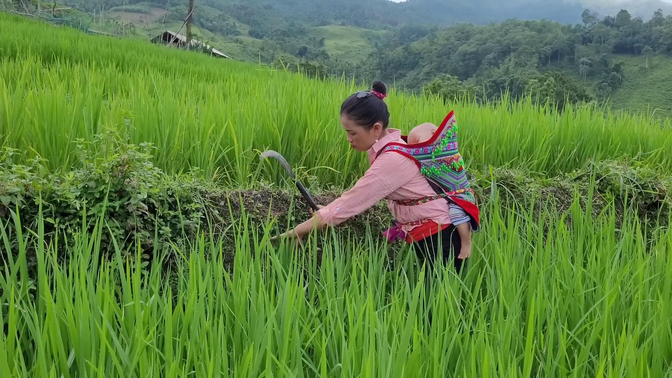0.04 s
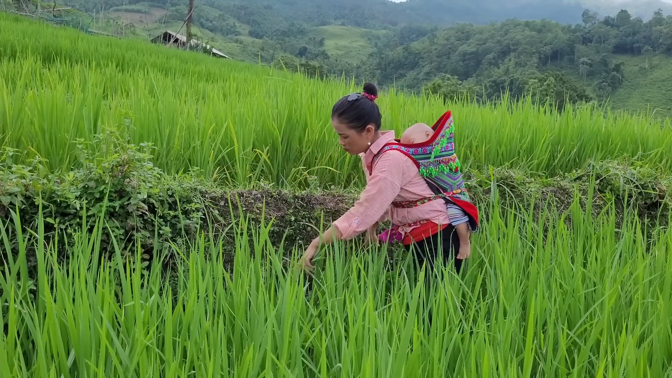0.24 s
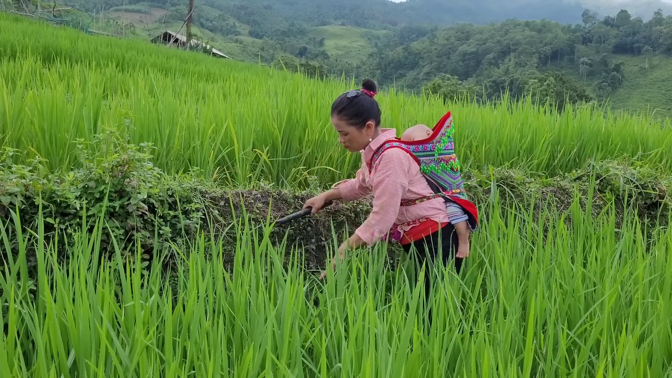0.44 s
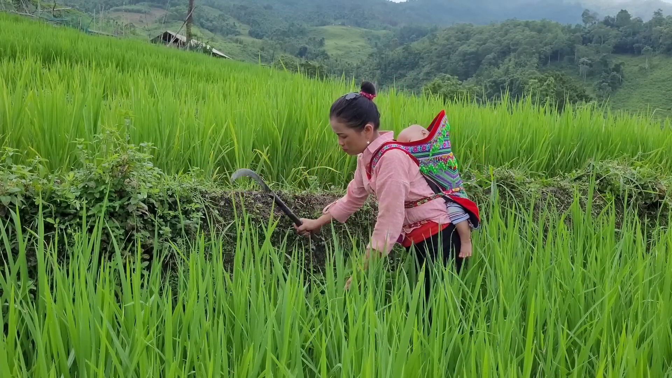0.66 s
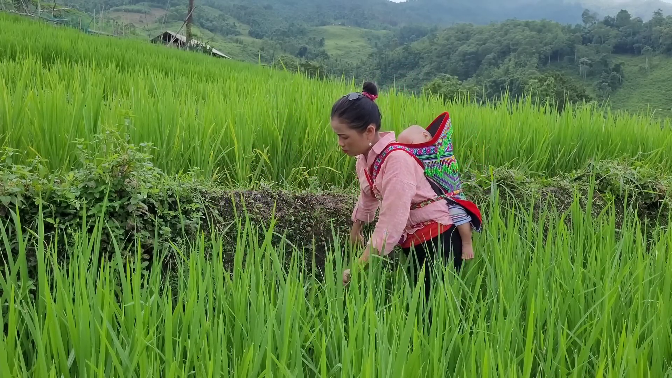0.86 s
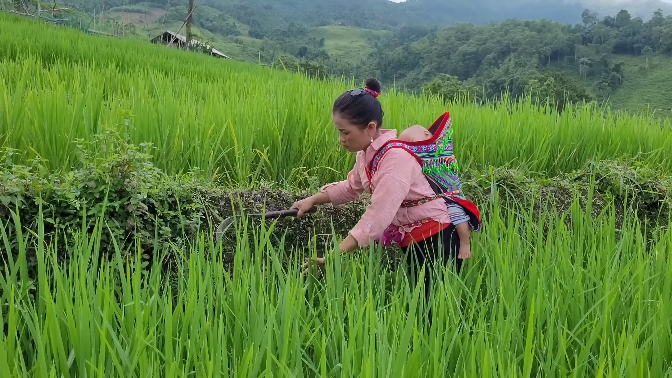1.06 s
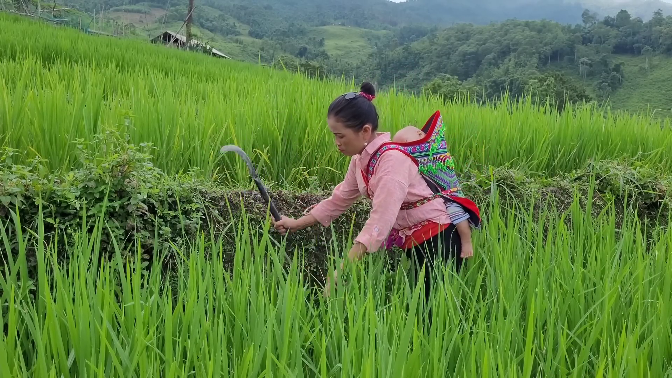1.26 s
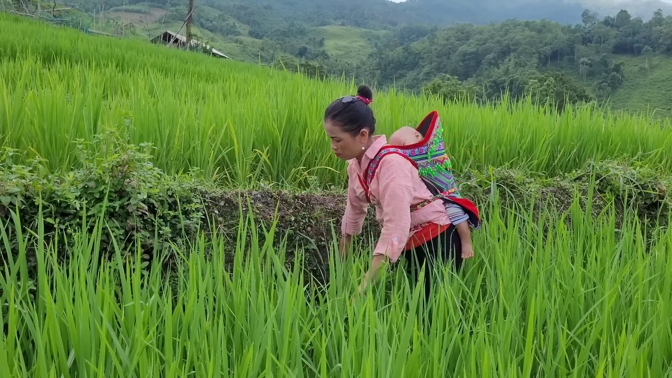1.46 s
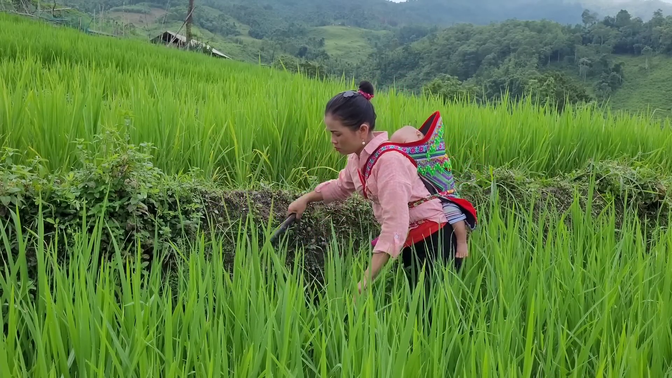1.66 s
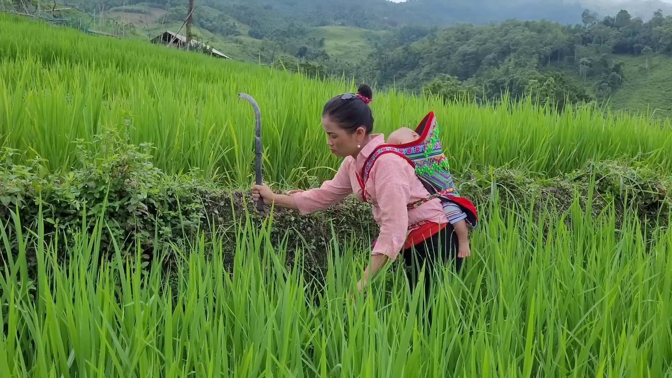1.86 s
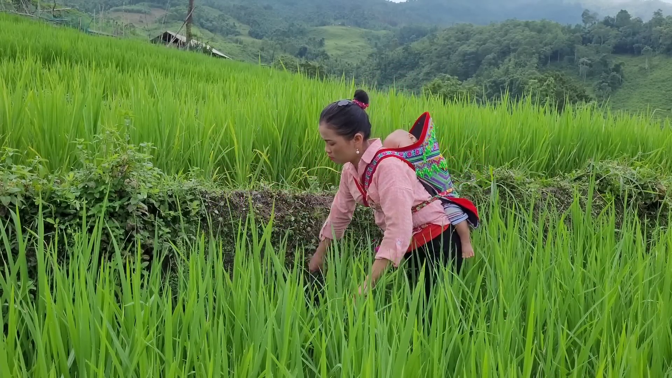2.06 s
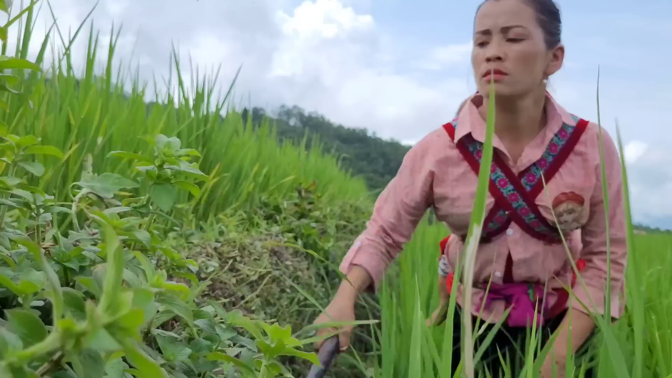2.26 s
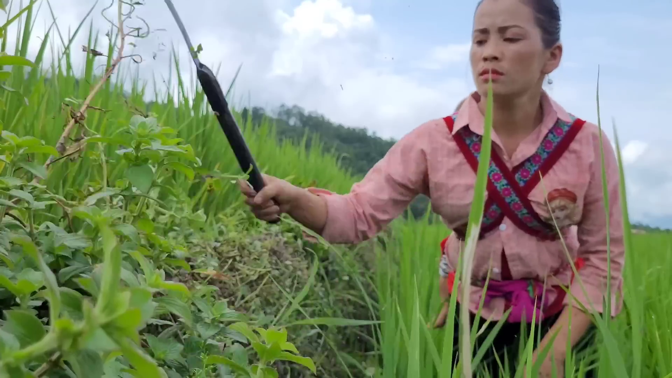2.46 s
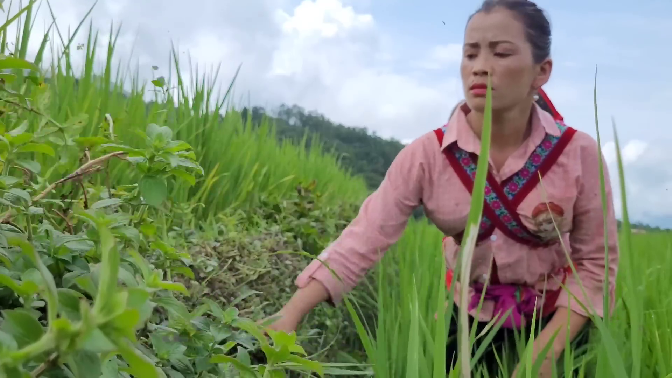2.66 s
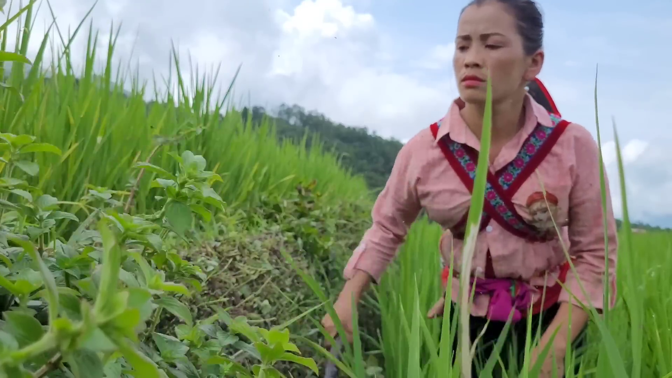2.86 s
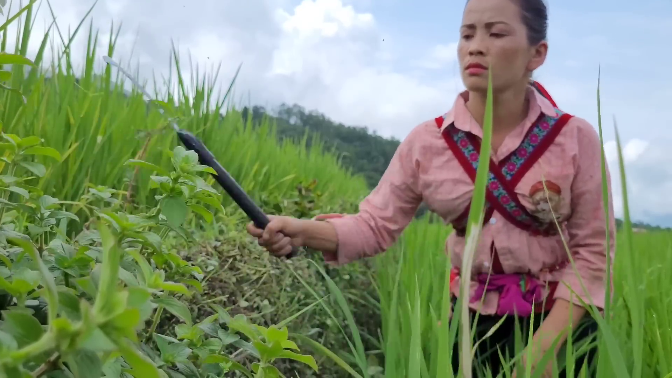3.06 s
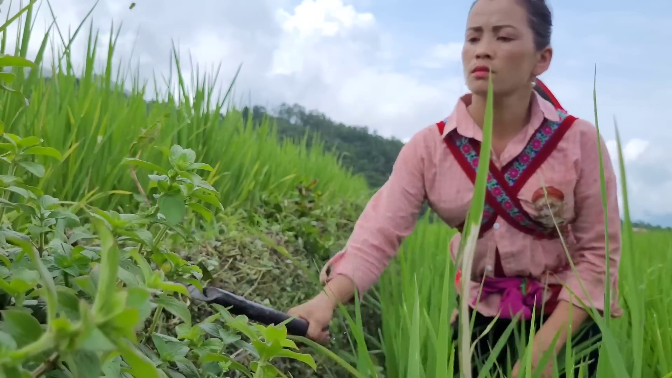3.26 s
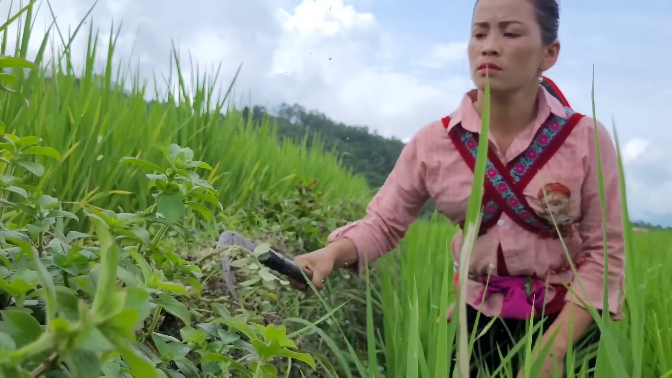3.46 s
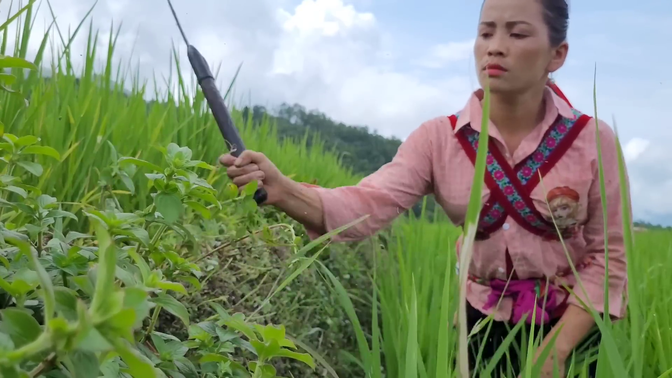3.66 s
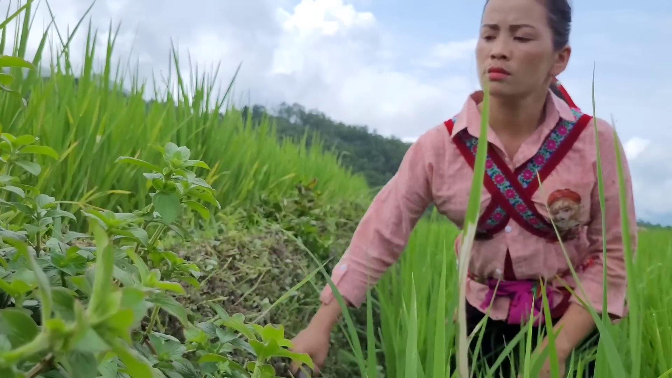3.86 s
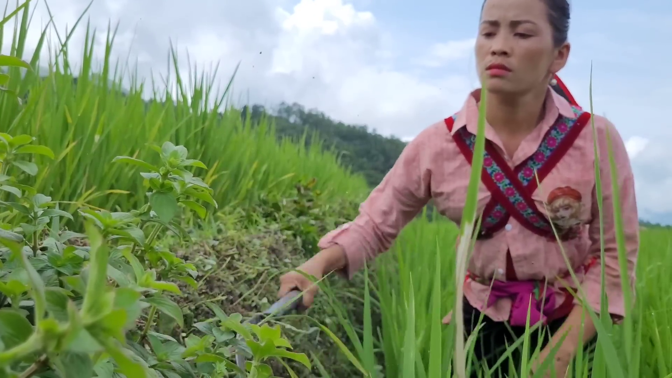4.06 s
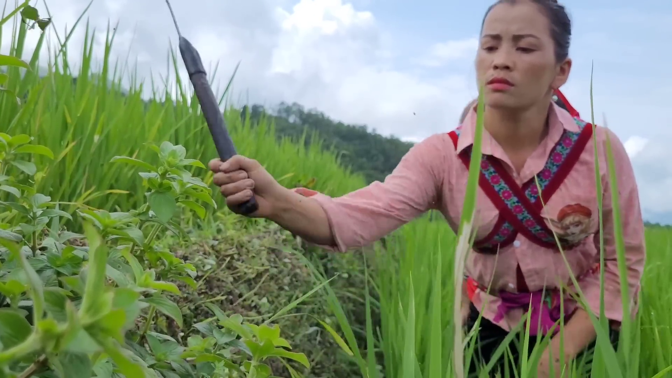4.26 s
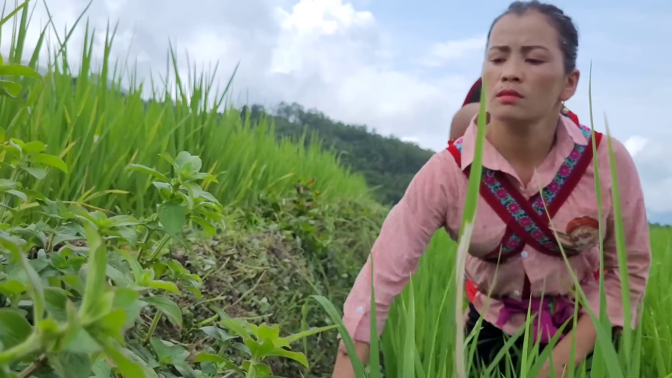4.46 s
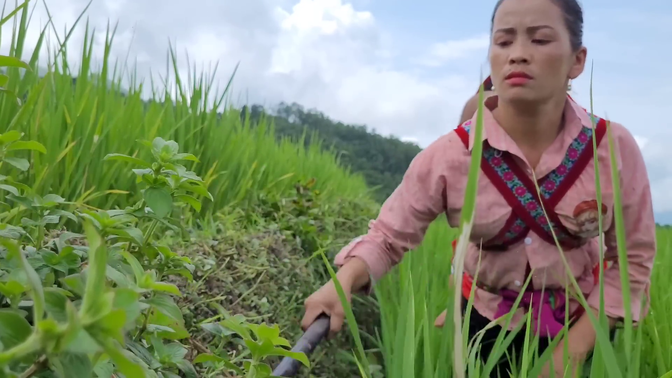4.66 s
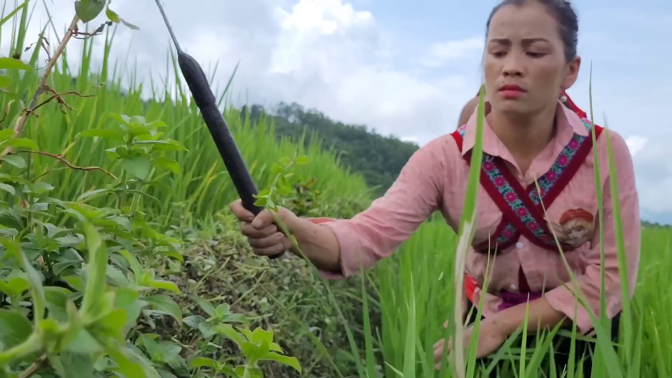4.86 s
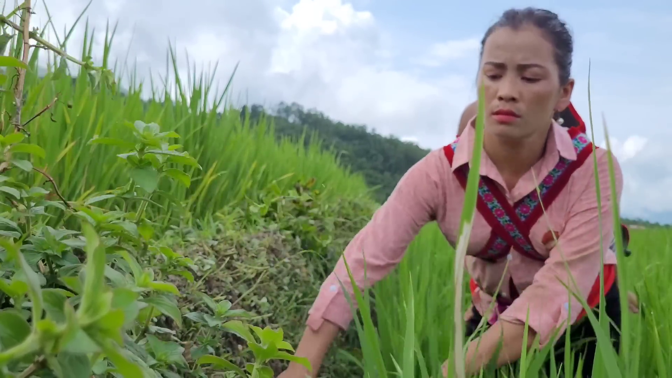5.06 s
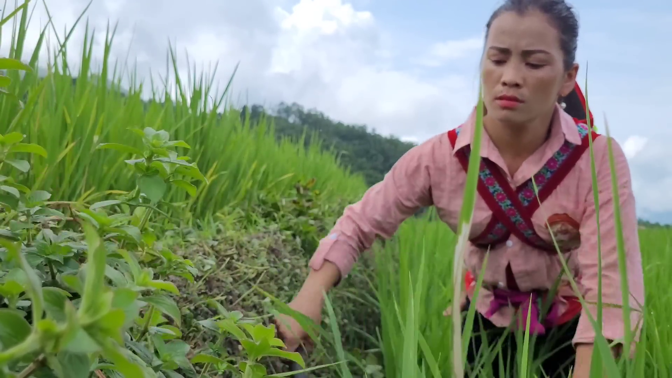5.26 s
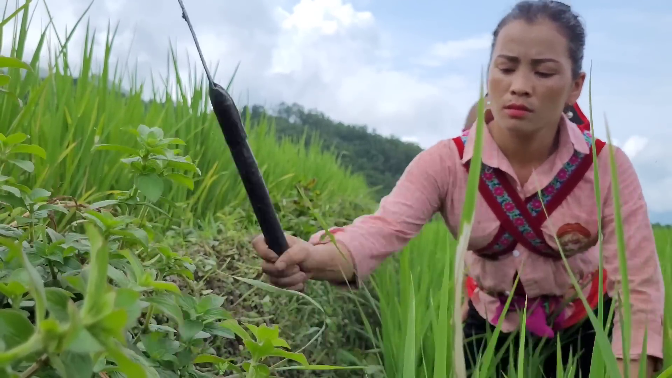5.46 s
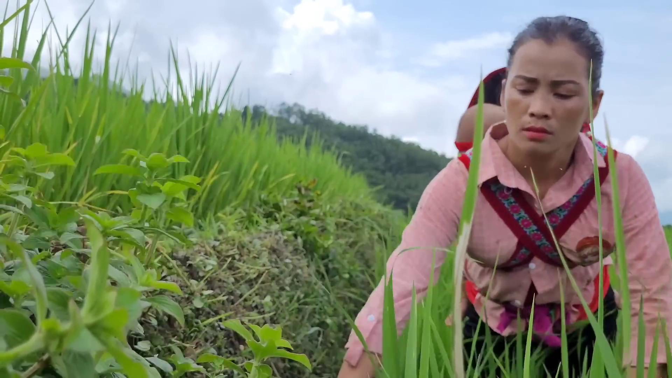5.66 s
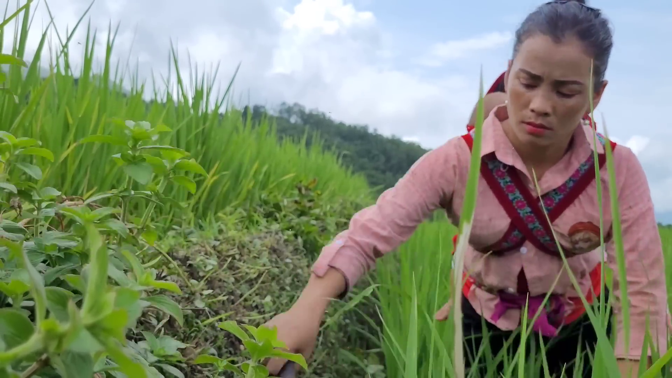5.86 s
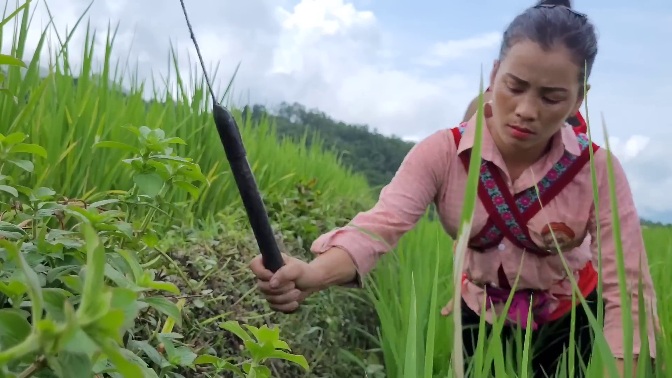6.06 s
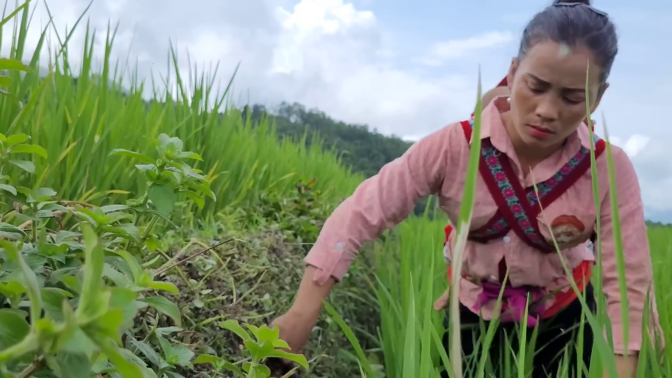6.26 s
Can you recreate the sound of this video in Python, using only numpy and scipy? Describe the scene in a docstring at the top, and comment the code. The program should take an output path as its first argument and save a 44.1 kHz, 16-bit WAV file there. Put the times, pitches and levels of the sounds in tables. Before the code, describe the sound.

A sickle chops weeds in quiet open country, eleven crunchy strokes at a steady pace, distant at first, then suddenly close and louder, leaves rustling between.

```python
"""A sickle slashes weeds off the bank of a rice terrace in quiet open country: eleven strokes.
The first four are heard from a few metres, with a clack of steel in the fourth; the other seven from close by.
Each stroke is a dense burst of tiny random fractures and ringing splinters; from the sixth on, most thump the soil.
Leaves rustle as a sparser crackle; single stems snap, and at 4.48 s the blade rings high, as damped tones.
From about 2.5 s a faint bird peeps in short gliding tones; coloured noise forms the air throughout."""
import sys
import numpy as np
from scipy import signal
from scipy.fft import rfft, irfft
from scipy.io import wavfile
from scipy.ndimage import uniform_filter1d

SR = 44100
rng = np.random.default_rng(int(sys.argv[2]) if len(sys.argv) > 2 else 0)


def wav_out(sig):
    """Save sig, one row per channel (or a flat mono array), as 16-bit PCM at SR to the path in sys.argv[1]."""
    wavfile.write(sys.argv[1], SR, np.round(np.clip(np.atleast_2d(sig).T, -1, 1) * 32767).astype(np.int16))


N = 278271
T = np.arange(N) / SR
CLOSE_FROM_S = 2.405  # heard from a few metres before, from close by after

# The sickle cuts, and the plants shake on:
# start_s, rise_s, hold_s, fade_s, level_db, treble_db and bass_db (leaves and wood, relative to level_db),
# shake_db, shake_fade_s
STROKES = [ (0.168, .015, 0.0064, 0.035, -24.5, 2, 3, -40, 0.17),
           (0.78, 0.021, 0.048, 0.016, -26.5, 1.5, 1.5, -44, 0.3),
           (1.397, .021, 0.035, 0.027, -21, 2.5, -3, -53, 0.17),
           (2.028, 0.0029, 0.031, 0.0097, -22, 6.5, 5.5, -32, 0.077),
           (2.754, .012, 0.0088, 0.035, -12.5, 0.5, 1.5, -37, 0.067),
           (3.316, 0.0085, 0.0064, 0.01, -19.5, 2, 0.5, -39.5, 0.21),
           (3.879, 0.0056, 0.011, 0.024, -17, -0.5, 3, -33, 0.18),
           (4.477, 0.0019, 0.037, 0.021, -14.5, 1.5, 1, -28, 0.11),
           (5.098, 0.013, 0.0038, 0.064, -14, -0.5, 1.5, -30, 0.28),
           (5.699, 0.013, 0.038, 0.031, -18, 2, 0.5, -31, 0.12),
           (6.254, .022, 0.012, 0.028, -16, 1.5, 1.5, -32, .15)]


def undb(db):
    """Amplitude ratio: decibels to gain."""
    return 10 ** (np.asarray(db) / 20)


def unit(x):
    """Power normalisation: scale to rms 1."""
    return x / np.sqrt(np.mean(x ** 2))


def response(points, size=2048):
    """Minimum phase: the causal impulse response of a (Hz, dB) colour, by folding its cepstrum."""
    hz, db = np.transpose(points)
    f = np.maximum(np.fft.rfftfreq(size, 1 / SR), 1)
    log_gain = np.log(undb(np.interp(np.log(f), np.log(hz), db)))
    cepstrum = irfft(log_gain)
    cepstrum[1:size // 2] *= 2
    cepstrum[size // 2 + 1:] = 0
    return irfft(np.exp(rfft(cepstrum)))


def colour(x, points):
    """Linear filtering: white sound takes on a colour and keeps its power."""
    h = response(points)
    return signal.fftconvolve(x, h[None] / np.linalg.norm(h), axes=1)[:, :N]


def near_or_far(x, far, near):
    """Distance colours sound: one spectrum from a few metres, another right beside the plants."""
    return np.where(T < CLOSE_FROM_S, colour(x, far), colour(x, near))


def split(x, hz):
    """Complementary bands: the parts below and above a frequency add up to the whole."""
    lowpass = signal.butter(2, min(hz, SR / 3), fs=SR, output="sos")
    low = signal.sosfiltfilt(lowpass, x)
    return low, x - low


def walk(rate):
    """Slow modulation: random levels at a rate (per second) joined by straight slopes, scaled to rms 1."""
    k = max(int(SR / rate), 2)
    steps = rng.standard_normal(N)[np.arange(N) // k]
    return unit(uniform_filter1d(steps, k))


def swell(s, rise, hold, fade):
    """Envelope of one movement: a straight rise, a hold and an exponential fade."""
    attack = np.clip((T - s) / rise, 0, 1)
    return attack * np.exp(-np.clip((T - s - rise - hold) / fade, 0, 20))


def ring(hz, t60, phase=0, size=12000):
    """Damped resonance: one mode falling by 60 dB in t60; 0 Hz at phase pi / 2 is the bare decay."""
    t = np.arange(size) / SR
    return np.sin(2 * np.pi * hz * t + phase) * np.exp(-np.log(1000) * t / t60)


def add(out, s, sound):
    """Superposition: mix a sound in at a time."""
    i = int(s * SR)
    out[:, i:i + sound.shape[-1]] += sound[..., :N - i]


def fractures(per_s, scatter_db, lag_ms, spread_ms):
    """Random impulses: tiny clicks of unequal size, each with its own lag between the ports for its direction."""
    excess = np.minimum(rng.standard_exponential(N), 4)
    size = rng.choice([-1, 1], N) * undb(scatter_db * excess)
    left = size * (rng.random(N) < per_s / SR)
    lag = (lag_ms + spread_ms * rng.standard_normal(N)) * SR / 1000
    arrival = np.rint(np.arange(N) + lag).astype(int) % N
    right = np.bincount(arrival, left, N)
    return unit(np.array([left, right]))


def splinters(t60_at_1k, scatter_db, count=3500):
    """Modal ringing: each broken stem has its own pitch; thick ones are low and ring longer."""
    out = np.zeros((2, N))
    for when, thinness, force, place in rng.random((count, 4)):
        khz = .2 * 18 ** thinness
        t60 = t60_at_1k / np.sqrt(khz)
        size = np.sqrt(khz) * undb(scatter_db * min(-np.log(1 - force), 3))
        lag_turns = khz * (.3 * place - .08)  # kHz times a lag in ms
        phases = -2 * np.pi * np.array([[0], [lag_turns]])
        add(out, when * N / SR, size * ring(1000 * khz, t60, phases, size=int(t60 * SR) + 2))
    return unit(out)


def country():
    """Diffuse field: far air swells gently, its bass more alike on both sides than its treble."""
    # colours of the open air: frequency_hz, gain_db
    far = [(25, -16), (65, 4), (110, -0.5), (270, 1.5), (600, 1), (1100, -1), (1700, 1.5), (2300, -20),
           (2850, -3.5), (3600, -25), (6500, -17), (16000, -25)]
    near = [(25, -15), (65, 7), (110, 2.5), (280, 5.5), (550, 7), (1000, -3), (1600, -0.5), (2500, -6.5),
            (3100, -28), (4800, -13), (7000, -14), (16000, -9.5)]
    mid, side = rng.standard_normal((2, N))
    side_low, side_high = split(side, hz=655)
    side = 0.51 * side_low + 1.7 * side_high
    air = unit(near_or_far(np.array([mid + side, mid - side]), far, near))
    return air * undb(-51.5 + 2.6 * walk(3.34))


def bird():
    """Frequency glide: short pure whistles rise and level off under a half-sine envelope."""
    # a far bird peeps: start_s, length_s, pitch_hz (reached at the end), level_db
    peeps = [(2.47, .08, 4920, -51), (3.403, .022, 4750, -44), (4.22, .12, 4690, -50),
             (4.412, .024, 4800, -46), (4.459, .026, 4850, -41), (5.57, .11, 4720, -54)]
    out = np.zeros((2, N))
    for s, length, hz, db in peeps:
        u = np.linspace(0, 1, int(length * SR))
        pitch = hz * (1 - 0.0565 * (1 - u) ** 3)
        whistle = np.sin(2 * np.pi * np.cumsum(pitch) / SR)
        add(out, s, undb(db) * np.sin(np.pi * u) * whistle)
    return out


def leaf_motion():
    """Powers add: level and treble share in dB of foliage that strokes leave shaking and raking stirs."""
    # weeds are pulled and cuttings raked aside:
    # start_s, length_s, fade_s, level_db, treble_db (relative to level_db)
    rakes = [ (0.375, 0.078, 0.043, -42, -3.5), (.5, 0.3, .06, -45, -1.5), (0.877, 0.19, 0.14, -43.5, -1.5),
             (1.163, 0.52, .1, -46.5, -2.5), (2.402, .075, 0.085, -40.5, -3),
             (2.585, 0.47, 0.063, -47, -4.5), (3.257, 0.21, 0.04, -45, -2), (3.564, 0.21, 0.13, -57, -1),
             (4.095, 0.046, 0.05, -43, -9), (4.313, 0.13, 0.07, -46.5, -5), (4.67, 0.37, 0.1, -41.5, -2.5),
             (5.204, 0.18, .06, -38.5, -1), (5.62, .07, .04, -60, 1)]
    rake_rise_s = 0.031
    moves = [(undb(-56) * np.ones(N), -4.5)]  # the leaves never quite rest
    for s, rise, hold, *_, db, fade in STROKES:
        shaking = undb(db) * swell(s, rise + hold, 0, fade)
        moves.append((shaking, -3))
    for s, length, fade, db, treble_db in rakes:
        raking = undb(db) * swell(s, rake_rise_s, length - rake_rise_s, fade)
        moves.append((raking, treble_db))
    power = sum(move ** 2 for move, _ in moves)
    treble = sum((undb(treble_db) * move) ** 2 for move, treble_db in moves)
    return 10 * np.log10(power), 10 * np.log10(treble / power)


def leaves():
    """Friction as random impulses: brushing grass and settling cuttings crackle unevenly, with twig ticks."""
    # colours of the foliage: frequency_hz, gain_db
    far = [(60, -31), (150, -1.5), (280, 1), (450, -9), (700, 0), (1000, -9), (1600, 1.5), (2300, -2.5),
           (3300, 2.5), (6000, -6), (8000, -7), (13000, -9), (16000, -13)]
    near = [(60, -12), (170, -1), (280, 5.5), (450, -0.5), (950, -3), (1500, 1.5), (2550, 1), (3000, -5),
            (4800, 0), (7000, -5.5), (9500, -6.5), (12300, -2.5), (16000, -10)]
    db, treble_db = leaf_motion()
    brushing = fractures(per_s=16000, scatter_db=2.9, lag_ms=.03, spread_ms=.13)
    twigs = splinters(t60_at_1k=0.02, scatter_db=4.5, count=1800)
    rustle = unit(brushing * undb(walk(60)) + undb(-14.0) * twigs)
    low, high = split(near_or_far(rustle, far, near), hz=5770)
    high_share = np.clip(undb(treble_db) ** 2, 0, .8)  # of power, before the band gains
    low_part = undb(1.5) * unit(low) * np.sqrt(1 - high_share)
    high_part = undb(4.5) * unit(high) * np.sqrt(high_share)
    return (low_part + high_part) * undb(db)


def snaps_and_blade_ring():
    """Impulsive excitation: a snapping stem, or the blade itself, gives a damped tone and a short noise crack."""
    # single stems snap; at 4.48 s (two rows) the blade itself rings high:
    # start_s, pitch_hz, t60_s, level_db (of the tone)
    tones = [ (.418, 1320, .014, -31.5), (1.405, 1440, .02, -20.5), (1.442, 1500, .006, -28),
             (1.538, 3500, .008, -35), (1.905, 1870, .031, -38), (2.213, 690, 0.096, -35.5),
             (2.363, 1290, .02, -42), (2.537, 9130, 0.0093, -25), (2.854, 1460, .04, -29),
             (2.858, 761, 0.079, -25.5), (3.146, 1370, 0.018, -30.5), (3.286, 1610, .03, -38),
             (3.643, 1670, .038, -37.5), (3.821, 1470, 0.039, -37), (4.400, 2260, 0.02, -34.5),
             (4.483, 6000, .015, -12), (4.49, 5800, .012, -13), (4.819, 1980, 0.014, -30),
             (4.875, 2310, .018, -27), (5.250, 1090, 0.02, -22.5), (5.836, 1450, 0.038, -28.5)]
    out = np.zeros((2, N))
    for s, hz, t60, db in tones:
        tone = ring(hz, t60)
        crack = rng.standard_normal((2, len(tone))) * ring(0, t60=0.014, phase=np.pi / 2)
        add(out, s, undb(db) * (tone + 0.39 * crack))
    return out


def steel_clacks():
    """Modal superposition: steel striking something hard rings in several damped modes at once."""
    # the steel clacks: start_s, level_db
    clacks = [(2.0612, -5), (2.0626, -7)]
    # its modes: frequency_hz, t60_s, level_db (relative to the clack)
    modes = [(1210, 0.029, -14.5), (2070, 0.013, -15), (3170, 0.017, -5), (3810, 0.02, -3.5),
             (4250, 0.018, -15), (8400, .008, -1)]
    out = np.zeros((2, N))
    for s, db in clacks:
        for hz, t60, mode_db in modes:
            # the blade is off to the left: the right port lags by 0.07 ms in phase
            right = ring(hz, t60, -2 * np.pi * hz * .00007)
            add(out, s, undb(db + mode_db) * np.array([ring(hz, t60), right]))
    return out


def soil_thumps():
    """Damped resonance: soft earth yields gradually and crumbles, so the thump swells in and is uneven."""
    # low strokes thump the soil: start_s, pitch_hz, t60_s, level_db (before the swelling in)
    thumps = [(3.332, 106, 0.13, -27), (3.352, 61, 0.14, -29.5), (3.894, 77, 0.12, -19),
              (4.499, 138, 0.18, -25), (4.520, 67, 0.18, -34), (5.719, 79.4, 0.2, -27.5),
              (6.274, 65, .12, -34)]
    out = np.zeros((2, N))
    for s, hz, t60, db in thumps:
        thud = ring(hz, t60) - ring(hz, t60=0.032)
        add(out, s, undb(db) * thud * undb(1.3 * walk(91)[:len(thud)]))
    return out


def bank_echo(x, delay_s, gain):
    """Comb filtering: the earth bank returns a dull copy a few milliseconds late, hollowing the sound."""
    dull = split(x, hz=2200)[0]
    return x + gain * np.array([np.interp(T - delay_s, T, port) for port in dull])


def blade_contact():
    """Powers add: cutting in bass, middle and treble, with outer leaves brushed just before each stroke."""
    # the blade grazes a few outer leaves: start_s, length_s, level_db
    grazes = [(.154, .016, -42), (.779, 0.0088, -35.5), (1.78, 0.0061, -45.5), (2.363, 0.0026, -45.5),
              (2.724, 0.015, -33), (4.957, 0.0068, -41), (5.093, .011, -30.5), (6.236, .01, -40),
              (6.245, 0.016, -33.5)]
    # a thick stalk gives way inside a stroke: start_s, level_db
    cracks = [(0.182, -18.5), (.801, -26), (0.831, -22), (0.845, -22), (1.426, -16), (1.441, -12),
              (2.029, -20), (2.7643, -8), (3.323, -13), (3.888, -17), (4.501, -1.5), (4.52, -8),
              (5.112, -10), (5.138, -12), (5.153, -11), (5.166, -11), (5.717, -9.5), (5.725, -8),
              (5.742, -13), (6.2552, -17)]
    # thick stalks are reached after the leaves; their fade is scaled by wood_linger
    wood_lag_s, wood_linger = 0.0036, 0.97
    graze_rise_s, graze_fade_s, graze_treble_db, graze_bass_db = 0.0017, 0.007, 5, 4.5
    power = np.zeros((3, N))
    for s, rise, hold, fade, db, treble_db, bass_db, _, _ in STROKES:
        brush = undb(-18.0) * np.exp(-np.minimum(abs(T - s) / 0.0047, 20))
        cut = np.maximum(brush, swell(s, rise, hold, fade))
        wood = np.maximum(brush, swell(s, rise + wood_lag_s, hold, fade * wood_linger))
        bands = np.array([undb(bass_db) * wood, cut, undb(treble_db) * cut])
        power += (undb(db) * bands) ** 2
    for s, length, db in grazes:
        gains = undb([db + graze_bass_db, db, db + graze_treble_db])
        power += np.outer(gains, swell(s, graze_rise_s, length, graze_fade_s)) ** 2
    for s, db in cracks:
        add(power, s, (undb(db) * ring(0, t60=0.0087, phase=np.pi / 2)) ** 2)
    return power


def slashes():
    """Random fracture: fibres break densely in spurts from stalk to stalk, then fade as the blade leaves."""
    # colours of the tearing: frequency_hz, gain_db
    far = [(40, -29), (145, -3.5), (205, -4), (300, -3.5), (470, -12), (780, -2.5), (1100, -5), (1500, -2),
           (2400, -3), (3300, 1), (5000, -4.5), (6800, -8.5), (13000, -8.5), (16000, -18)]
    near = [(35, -38), (130, -4.5), (190, -8), (320, -4), (560, -5.5), (1000, -6), (1600, -3), (2550, -5),
            (2950, -13.5), (4500, -3.5), (5950, -6), (6700, -8), (13000, -7), (16000, -8.5)]
    fibres = fractures(per_s=24000, scatter_db=2.3, lag_ms=.06, spread_ms=.11)
    stems = splinters(t60_at_1k=0.03, scatter_db=2.0)
    breaking = unit(fibres * undb(1.2 * walk(350)) + undb(-9.0) * stems)
    tearing = bank_echo(near_or_far(breaking, far, near), delay_s=0.003795, gain=0.18)
    bass, rest = split(tearing, hz=546)
    middle, treble = split(rest, hz=5900)
    return sum(band * np.sqrt(power) for band, power in zip((bass, middle, treble), blade_contact()))


def scene():
    """Free field: the sources simply add, with no reverberation."""
    knocks = snaps_and_blade_ring() + steel_clacks() + soil_thumps()
    return country() + bird() + leaves() + knocks + slashes()


def record(dry):
    """Transducer response: two ports differ a little in colour, peaks are clipped and the top is cut off."""
    # the two microphone ports: frequency_hz, left_minus_right_db
    port_difference = [(40, -3), (140, 2), (400, -0.5), (1100, -3.5), (2200, -1.5), (4200, -1.5),
                       (8000, -0.8), (13000, -0.5)]
    ports = []
    for x, side in zip(dry, (1, -1)):
        points = [(hz, side * db / 2) for hz, db in port_difference]
        ports.append(signal.fftconvolve(x, response(points))[:N])
    top = signal.ellip(10, .2, 80, 15750, fs=SR, output="sos")  # low-pass, Hz
    return signal.sosfilt(top, np.clip(ports, -.8, .8))


dry = scene()
out = record(dry)
wav_out(out)
```